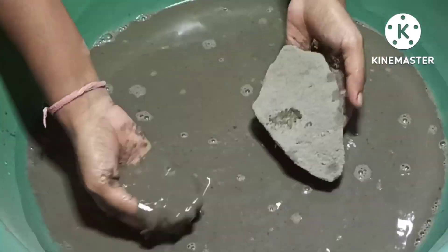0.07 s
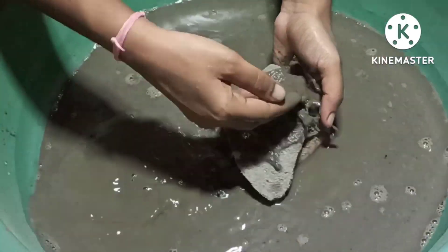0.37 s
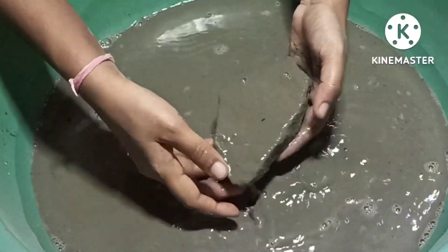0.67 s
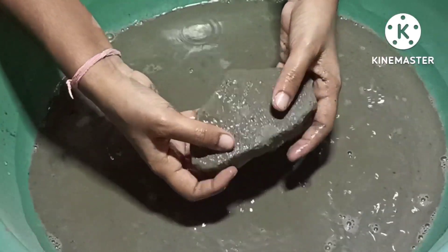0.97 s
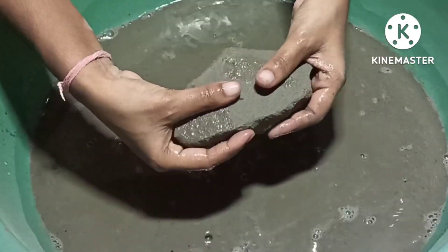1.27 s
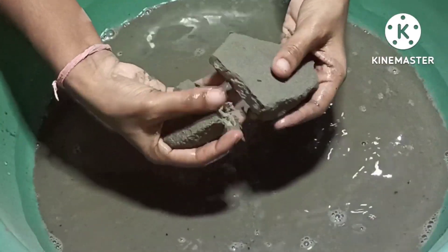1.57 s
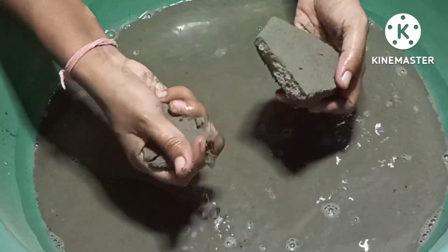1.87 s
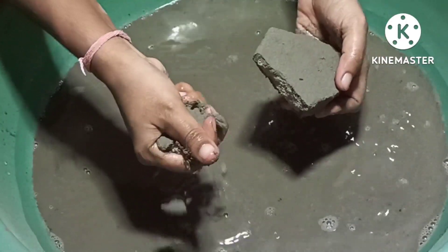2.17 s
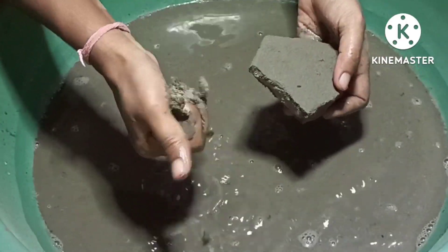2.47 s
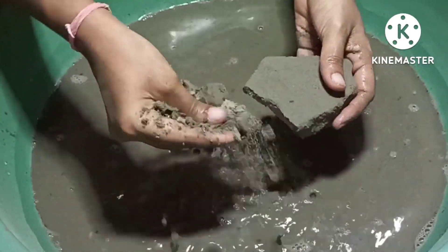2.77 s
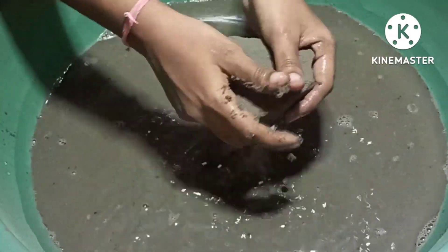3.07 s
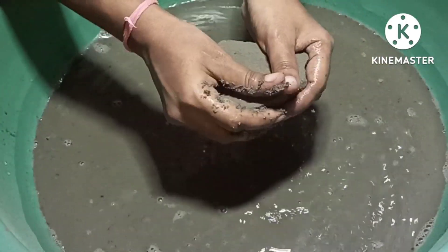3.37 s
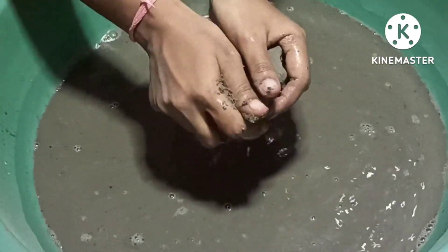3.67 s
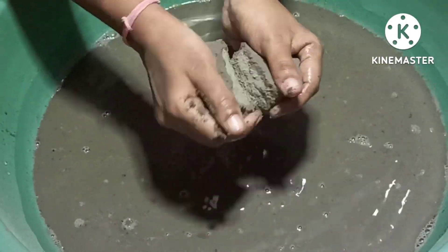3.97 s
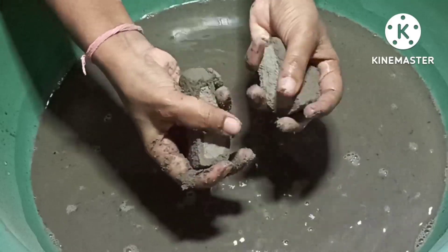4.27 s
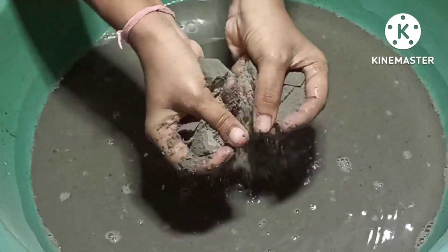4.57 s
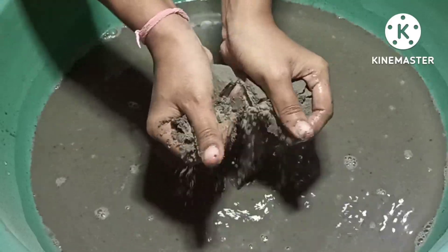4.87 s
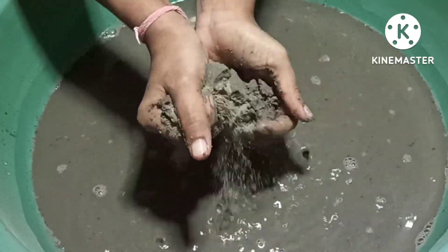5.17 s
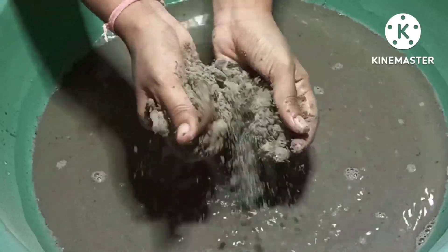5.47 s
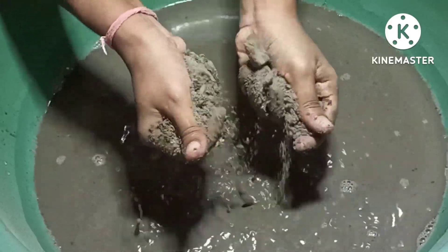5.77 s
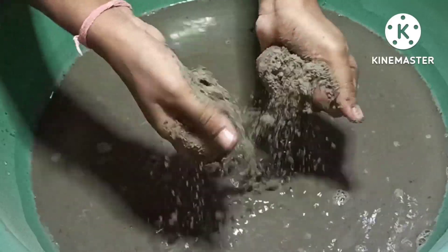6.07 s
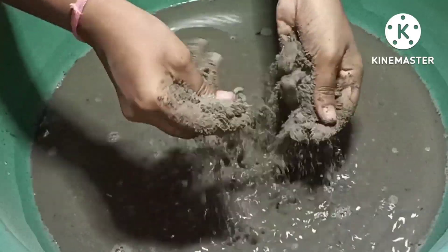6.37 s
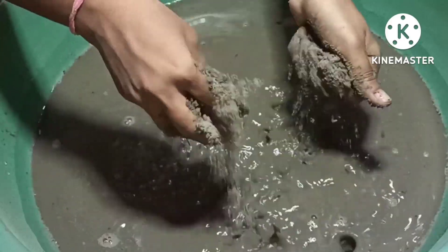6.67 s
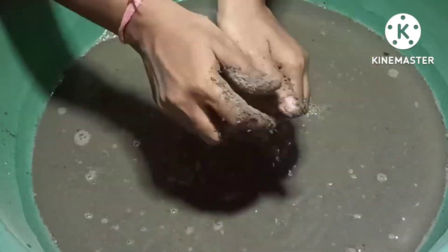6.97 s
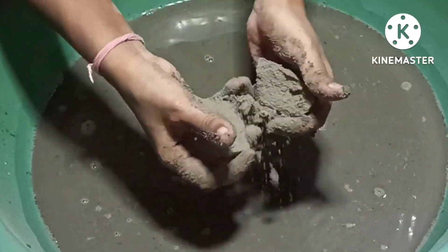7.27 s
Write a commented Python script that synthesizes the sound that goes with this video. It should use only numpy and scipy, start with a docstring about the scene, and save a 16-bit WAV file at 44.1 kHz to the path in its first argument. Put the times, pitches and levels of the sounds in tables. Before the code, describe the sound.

Close crunching of sandy slabs crushed by hand, with dull snaps and grit pattering and plopping into water indoors.

```python
"""Indoors, one microphone close to a plastic tub of muddy water; two hands crumble gritty slabs of sand
and cement just above it. From the start, over a low hum, each squeeze rasps and sheds sand: crumbs hit the
water with a tick and a bubble's plink, fine sand patters among them, and the tub rings a little.
From about 2 s the slabs snap with dull thumps, the hardest near 5.6 s. Towards the end the plinks are
shorter, as sand has thickened the water, and the hum comes up in the last half second."""
import sys
import numpy as np
from scipy import signal
from scipy.fft import rfft, irfft, next_fast_len
from scipy.io import wavfile
from scipy.ndimage import uniform_filter1d, map_coordinates

SR = 44100
rng = np.random.default_rng(int(sys.argv[2]) if len(sys.argv) > 2 else 0)


def store_wav(level_fs):
    """Save 16-bit WAV to argv[1]."""
    pcm = np.round(np.clip(np.atleast_2d(level_fs), -1, 1) * 32767)
    wavfile.write(sys.argv[1], SR, pcm.T.astype(np.int16))


N = 332073

# Fingers squeeze a slab. Each row: start and length in seconds, rasp and shed sand in relative dB.
GRIPS = [(0, .05, -54.5, -54), (0.115, .15, -53.5, -55), (.39, .19, -52.5, -53), (0.622, .2, -60, -59),
         (0.948, .35, -66.5, -68), (1.49, 0.023, -52, -79), (1.841, .15, -52, -61),
         (2.096, .04, -55.5, -59), (2.302, .32, -52.5, -53), (2.797, .06, -49.5, -54),
         (2.978, .1, -56, -52), (3.14, .09, -59, -53), (3.525, 0.07, -61.5, -74), (3.75, .19, -57, -61),
         (4.202, 0.14, -56.5, -74), (4.361, .13, -55.5, -55), (4.581, .16, -47, -48),
         (4.799, .18, -49, -47.5), (5.099, .06, -46.5, -49), (5.22, .25, -55.5, -52.5),
         (5.61, .62, -50, -50), (6.358, .4, -51.5, -50), (6.86, .25, -53.5, -51), (7.184, .16, -57.5, -63),
         (7.46, 0.21, -55.5, -60)]
# Tone of the rasping sand. Each row: frequency in Hz, gain in dB.
RASP_SPECTRUM = [(300, -53), (900, -22.5), (2200, -14), (4000, 5.5), (6500, 1), (9000, -1.5), (15000, -7.5)]
# Tone of the kneading hands. Each row: frequency in Hz, gain in dB.
RUSTLE_SPECTRUM = [(40, -40), (100, 3.5), (170, 2.5), (260, -1.5), (380, -1.5), (600, -9.5), (1000, -20.5),
                   (2500, -21.5)]
# Tone of the room's rumble. Each row: frequency in Hz, gain in dB.
RUMBLE_SPECTRUM = [(20, -2), (45, -20), (62, -2), (90, -1.5), (130, -3), (250, -22), (800, -34)]
# A motor somewhere in the house. Each row: frequency in Hz, relative level in dB.
MOTOR_TONES = [(64.6, -5.5), (113, -17), (161.5, -2.5), (210, -4.5)]
# Rumble and hum together over time. Each row: time in seconds, gain in dB.
ROOM_TONE_LEVELS = [(0, -48.5), (.2, -60.5), (6.9, -60), (7.4, -49)]
# Crumbs and drips hitting the water, a few sharp slab cracks and a ring of the tub.
# Each row: time in seconds, plink level in dB, plink pitch in Hz, tick in relative dB.
TICKS_AND_PLINKS = [(0.0109, -17.5, 4430, -25), (0.0136, -25, 1640, -10.5), (0.1331, -30, 2610, -12),
                    (0.1424, -16, 4080, -20), (0.2125, -29.5, 1590, -11.5), (0.2288, -26.5, 1940, -15),
                    (0.2924, -24.5, 1900, -10), (0.3041, -15.5, 1644, -23), (0.3129, -31, 1380, -34),
                    (0.4073, -19, 2270, -8), (0.4108, -13.5, 4600, -8.5), (0.4295, -15.5, 2350, -10),
                    (0.46, -24.5, 1033, -8.5), (0.558, -14.5, 3920, -21), (0.5675, -18.5, 2530, -18),
                    (0.587, -25, 3820, -25), (0.6433, -32.5, 2480, -24), (0.7002, -26.5, 3520, -34),
                    (0.956, -31.5, 3660, -31), (1.0506, -36.5, 2600, -35), (1.2024, -34, 3620, -37),
                    (1.3246, -30.5, 3430, -32), (1.9803, -21.5, 2470, -4), (2.1067, -18.5, 1420, -14.5),
                    (2.3422, -25.5, 1500, -17.5), (2.4341, -25, 1780, -10), (2.47, -22.5, 1310, -27),
                    (2.5985, -18, 2250, -6.5), (2.675, -24.5, 3870, -19), (2.7135, -29.5, 1460, -29),
                    (2.8327, -19, 2970, -16), (2.8532, -23.5, 2100, -11), (2.8658, -24, 2060, -15),
                    (2.8764, -24, 2760, -15), (2.9198, -14.5, 1430, -1), (2.9572, -28, 1510, -9),
                    (2.9821, -19, 2010, -10), (3.016, -22.5, 6200, -8.5), (3.0455, -31.5, 1050, -7.5),
                    (3.1476, -22.5, 3620, -40), (3.157, -27.5, 754, -10.5), (3.1658, -25.5, 1380, -24),
                    (3.2403, -23, 3900, -19), (3.2903, -28.5, 1430, -16.5), (3.3345, -30, 2430, -25),
                    (3.6562, -29, 4100, -78), (4.696, -25, 1680, -19), (4.7333, -22, 1870, -16),
                    (4.803, -23, 4670, -28), (4.987, -24, 1360, -48), (5.049, -26.5, 1780, -33),
                    (5.1828, -27, 1520, -22), (5.208, -24.5, 1370, -18), (5.2192, -24, 1370, -24),
                    (5.5225, -22, 3570, -22), (5.6002, -7, 4750, -12), (5.6297, -17.5, 2740, -1),
                    (5.7425, -22, 3920, -15), (5.7816, -22.5, 2850, -10), (5.8848, -14.5, 5600, -34),
                    (5.9596, -24.5, 2850, -30), (6.1156, -16.5, 3060, -20), (6.3217, -21, 3830, -30),
                    (6.3436, -25, 2590, -14), (6.375, -20.5, 3070, -32), (6.386, -18.5, 1350, -9),
                    (6.6827, -19.5, 3140, -20), (6.7048, -17.5, 3620, -17), (6.7508, -21, 4360, -7),
                    (6.861, -21.5, 1870, -15.5), (6.982, -23.5, 1300, -36), (7.0082, -21.5, 2725, -16.5),
                    (7.0719, -15.5, 3520, -28), (7.4466, -11.5, 4000, -15)]
# Resonances of the air in the tub. Each row: frequency in Hz, width in Hz, relative gain in dB.
TUB_MODES = [(177.5, 6.3, 17), (376.6, 31, 8), (1044, 90, 1), (1371, 44, 3), (1716, 36, 7.5),
             (2495, 60, -43)]
# The room's reverberation. Each row: frequency in Hz, seconds to die away by 60 dB.
ROOM_DECAY = [(200, 0.98), (1500, 0.79), (5000, 1), (14000, 0.084)]
# Larger pieces slap into the water.
# Each row: time in seconds, relative level in dB, scatter in seconds, middle bubble pitch in Hz.
PIECE_SPLASHES = [(0.131, -36.5, 0.0087, 3050), (0.226, -42.5, 0.012, 1860), (0.405, -24, 0.0035, 2700),
                  (0.428, -26, 0.0038, 2900), (0.46, -36.5, 0.01, 1290), (0.561, -45.5, .075, 2865),
                  (2.988, -32.5, 0.003, 3480), (6.386, -38, 0.0089, 1440)]
# Lumps crushed between the fingers. Each row: peak time in seconds, level in dB, half-width in seconds.
CRUSHED_LUMPS = [(0.151, -34.5, 0.0047), (1.493, -49.5, 0.024), (2.29, -39.5, 0.0084), (3.868, -53, 0.082),
                 (4.375, -39.5, 0.015), (4.529, -35, 0.01), (4.58, -40.5, 0.015), (4.962, -32, 0.0033),
                 (5.257, -32, 0.0029), (5.568, -39, 0.019), (5.63, -18, 0.0014), (6.352, -35, 0.0098)]
# Tone of a collapsing lump. Each row: frequency in Hz, gain in dB.
CRUNCH_SPECTRUM = [(80, -34), (300, 14.5), (1200, 11.0), (4000, 10.0), (7000, 11.5), (15000, -1.0)]
# A slab gives way. Each row: time in seconds, relative thump level in dB, thump pitch in Hz.
SLAB_BREAKS = [(1.905, -29.5, 300), (1.982, -30, 360), (2.338, -22.5, 640), (2.602, -28.5, 390),
               (3.812, -31.5, 284), (3.935, -23.5, 300), (4.354, -31, 292), (4.524, -28, 324),
               (4.958, -24, 380), (5.569, -18, 533), (5.629, -14.5, 366), (6.353, -30, 334),
               (6.756, -30, 252), (7.448, -28.5, 404)]
# The treble is dulled in steps, band by band. Each entry: a band edge in Hz.
BAND_EDGES_HZ = [4780, 6100, 6850, 7700, 8580, 11550]
# The dulling below, between and above those edges, deepest around 9-11 kHz. Each entry: gain in dB.
BAND_GAINS_DB = [-1, -8, -0.5, -4, -13.5, -25.5, -5]

GRIP_ATTACK_S, GRIP_RELEASE_S, TIRE_DB_PER_S = .022, 0.075, 4  # a squeeze builds, slackens and lets go
GRIP_TREMBLE_DB, GRIP_TREMBLE_PER_S = 1.85, 18  # the fingers never press evenly
FALL_S, SETTLE_S = .02, .07  # sand reaches the water a little later and trickles on afterwards
RESTING_RASP_DB, RESTING_SAND_DB = -63.5, -69  # between squeezes, on the scale of GRIPS
BUBBLE_HZ, BUBBLE_LIFE_S, LIFE_POWER = 1960, .0028, 1.21  # before sand falls; smaller bubbles die sooner
MUD_DAMPING = 0.84  # bubble life shrinks by exp(-this) once all the sand has fallen
TOP_HZ = 15600  # nothing is heard above this


def amp(db):
    """Decibels to gain."""
    return 10 ** (np.asarray(db) / 20)


def unit(x):
    """Scale to rms 1."""
    return x / np.sqrt(np.mean(x ** 2) + 1e-20)


def along(points, hz):
    """Read (Hz, value) points on a log axis."""
    f, v = np.transpose(points)
    return np.interp(np.log(hz + 1), np.log(f + 1), v)


def curve(rows):
    """One value per sample from (seconds, value) rows."""
    return np.interp(np.arange(N) / SR, *np.transpose(rows))


def wobble(rate):
    """A smooth random curve, rate knots a second."""
    return map_coordinates(rng.standard_normal(int(N * rate / SR) + 4), [np.arange(N) * rate / SR])


def scatter(count, traits):
    """For each trait, count normal draws held within two deviations."""
    return np.clip(rng.standard_normal((count, traits)), -2, 2).T


def coloured(x, gain_db):
    """Causal (minimum-phase) filter with the given dB curve of frequency."""
    m = 2 * next_fast_len(N // 2 + 8192)
    cepstrum = irfft(np.log(amp(gain_db(np.fft.rfftfreq(m, 1 / SR)))), m)
    cepstrum[1:m // 2] *= 2
    cepstrum[m // 2 + 1:] = 0
    return irfft(rfft(x, m) * np.exp(rfft(cepstrum)), m)[:N]


def shaped(x, spectrum):
    """x filtered by (Hz, dB) points, at rms 1."""
    return unit(coloured(x, lambda hz: along(spectrum, hz)))


def placed(times, waves):
    """Sum short waves, one a row, each from its own time."""
    at = np.round(np.maximum(times, 0) * SR).astype(int)[:, None] + np.arange(waves.shape[1])
    return np.bincount(at.ravel(), waves.ravel(), N)[:N]


def squeezing(levels_db, lag_s, release_s, resting_db):
    """Level in dB over time: every squeeze is an attack, a sagging hold and a release."""
    start, length = np.transpose(GRIPS)[:2]
    t = np.linspace(0, N / SR, 2000)
    age = t[:, None] - lag_s - start
    attack = np.exp(np.minimum(age, 0) / GRIP_ATTACK_S)
    hold = amp(levels_db - TIRE_DB_PER_S * np.clip(age, 0, length))
    release = np.exp(-np.maximum(age - length, 0) / release_s)
    power = amp(resting_db) ** 2 + np.sum((attack * hold * release) ** 2, axis=1)
    return curve(np.column_stack([t, 10 * np.log10(power)]))


def grit(rate, spread_db):
    """Grains breaking loose: random impulses of unequal size, at rms 1."""
    sizes = amp(spread_db * np.minimum(rng.standard_normal(N), 2.5)) * rng.choice([-1, 1], N)
    return unit(sizes * (rng.random(N) < rate / SR))


def rubbing(rasp_db, gain_db=6):
    """Close to the microphone, grains rasp past each other in uneven slips over a smoother hiss."""
    grains = grit(rate=7000, spread_db=9.5) * amp(4.35 * wobble(90))
    hiss = 0.89 * rng.standard_normal(N)
    return amp(rasp_db + gain_db) * shaped(grains + hiss, RASP_SPECTRUM)


def kneading(rasp_db, rustle_db=-54, follow=0.41):
    """The hands rustle, soft and low, louder as they squeeze."""
    level_db = rustle_db + follow * (rasp_db - rasp_db.mean()) + 2.3 * wobble(25)
    return amp(level_db) * shaped(rng.standard_normal(N), RUSTLE_SPECTRUM)


def room_tone():
    """The room rumbles, and a motor farther off in the house adds a wavering hum."""
    t = np.arange(N) / SR
    hum = sum(amp(db) * np.sin(2 * np.pi * hz * t + .5 * wobble(8.1)) for hz, db in MOTOR_TONES)
    rumble = shaped(rng.standard_normal(N), RUMBLE_SPECTRUM)
    return amp(curve(ROOM_TONE_LEVELS)) * (rumble + hum)


def bubbles(hz, life_s, fall, samples=700, decay_power=2.17):
    """Trapped air rings, drops in pitch as it is drawn under the surface, and is soon cut short."""
    t = np.arange(samples) / SR
    age = t / life_s[:, None]
    glide = 1 + fall * (.5 - np.minimum(age, 2))
    turns = hz[:, None] * np.cumsum(glide, axis=1) / SR
    return -np.sin(2 * np.pi * turns) * np.exp(-age ** decay_power)


def muffling(s, mud):
    """Share of its life that a bubble keeps at time s, as the water thickens with sand."""
    return np.exp(-MUD_DAMPING * np.interp(s, np.arange(N) / SR, mud))


def ticks_and_plinks(hits, mud, tick_s=0.000073, spray_s=0.0015, spray_db=-15, tick_db=13.5, top_hz=11000):
    """A crumb ticks on the water, sprays and leaves a ringing bubble; slab cracks share the shape."""
    s, db, hz, impact_db = np.transpose(hits)
    t = np.arange(700) / SR
    life_s = BUBBLE_LIFE_S * (BUBBLE_HZ / hz) ** LIFE_POWER * muffling(s, mud)
    plinks = amp(db)[:, None] * bubbles(hz, life_s, fall=.13)
    envelope = np.exp(-t / tick_s) + amp(spray_db) * np.exp(-t / spray_s)
    burst = rng.standard_normal((len(s), len(t))) * envelope
    burst /= np.linalg.norm(burst, axis=1, keepdims=True)
    contact_age = t / 4.5e-5
    slap = (1 - contact_age) * np.exp(-contact_age)  # first contact is one sharp pressure pulse
    # a small crumb makes both a high bubble and a bright tick; a big one is duller
    jf = 1j * np.fft.rfftfreq(len(t), 1 / SR)
    ratio = jf / hz[:, None]
    colour = (ratio / (1.065 + ratio)) ** 2 / (1 + ratio / 0.92) / (1 + jf / top_hz)
    ticks = irfft(rfft(burst - slap) * colour, len(t)) * amp(impact_db + tick_db)[:, None]
    return placed(s, plinks + ticks)


def satellite_droplets(mud, count=3, scatter_s=.004, lag_s=0.0008, spread=0.45, cycles=5.5, gain_db=-15):
    """Each listed hit throws up a few droplets that land just after it and ring smaller bubbles of their own."""
    s, hit_db, hit_hz = np.repeat(TICKS_AND_PLINKS, count, axis=0).T[:3]
    delay, pitch, size = scatter(len(s), 3)
    hz = np.maximum(np.sqrt(hit_hz * 3500) * np.exp(spread * pitch), hit_hz)
    db = np.minimum(hit_db, -19) + gain_db + 5.0 * size
    waves = amp(db)[:, None] * bubbles(hz, cycles / hz * muffling(s, mud), fall=0.14)
    return placed(s + lag_s + scatter_s * np.abs(delay), waves)


def tub(x, ring_db=-3, wall_db=-15):
    """The air above the water rings in a few modes, and the walls answer within milliseconds."""
    m = next_fast_len(N + SR // 2)
    f = np.fft.rfftfreq(m, 1 / SR)
    modes = sum(amp(db) * 1j * f * width / (hz * hz - f * f + 1j * f * width)
                for hz, width, db in TUB_MODES)
    walls = sum(np.exp(-2j * np.pi * f * s) for s in (.0023, .0049, .0083)) / (1 + 1j * f / 4000)
    return irfft(rfft(x, m) * (amp(ring_db) * modes + amp(wall_db) * walls), m)[:N]


def room(x):
    """The room returns a short diffuse tail whose top treble dies first."""
    hz, t, noise = signal.stft(rng.standard_normal(SR // 2), SR, nperseg=256)
    decay = amp(-60 * t / along(ROOM_DECAY, hz)[:, None])
    tail = signal.istft(noise * decay, SR, nperseg=256)[1]
    return signal.fftconvolve(np.pad(x, (300, 0)), tail / np.linalg.norm(tail))[:N]


def patter(sand_db, count, centre_hz, spread, cycles, spread_db, gain_db):
    """Falling sand makes a crowd of short-lived bubbles, as loud as the pour is thick."""
    when = rng.random(count) * N / SR
    pitch, size, ringing = scatter(count, 3)
    hz = centre_hz * np.exp(spread * pitch)
    life_s = cycles * np.exp(.3 * ringing) / hz
    waves = amp(spread_db * size)[:, None] * bubbles(hz, life_s, fall=0.033, samples=400)
    return amp(sand_db + gain_db) * unit(placed(when, waves))


def small_crumbs(sand_db, count=95, loose_db=-57, level_db=-31, follow=0.094, spread_db=3,
                 centre_hz=3500, spread=0.27, impact_db=6):
    """Rows of small crumbs that fall once the sand runs freely, denser and louder as it thickens."""
    chance = np.cumsum(np.maximum(sand_db - loose_db, 0))
    at = np.searchsorted(chance / chance[-1], (np.arange(count) + rng.random(count)) / count)
    size, pitch, hardness = scatter(count, 3)
    db = level_db + follow * (sand_db[at] - np.median(sand_db[at])) + spread_db * size
    hz = centre_hz * np.exp(spread * pitch)
    return np.column_stack([at / SR, db, hz, db + impact_db + spread_db * hardness])


def splashes(count=70, spread=0.335, cycles=4, gain_db=-2):
    """A larger piece folds in a whole cluster of bubbles at once."""
    out = np.zeros(N)
    for s, db, scatter_s, centre_hz in PIECE_SPLASHES:
        delay, pitch, size = scatter(count, 3)
        hz = centre_hz * np.exp(spread * pitch)
        waves = amp(2 * size)[:, None] * bubbles(hz, cycles / hz, fall=0.017)
        cluster = placed(s + scatter_s * delay, waves)
        out += amp(db + gain_db) * cluster * np.sqrt(2 * scatter_s * SR) / np.linalg.norm(cluster)
    return out


def droplets(count=4, flight_s=.36, level_db=-27, fade_db_per_s=22, spread_db=2.5,
             centre_hz=3200, spread=0.21):
    """Rows of droplets thrown up by each splash; the longer they fly, the softer they land."""
    s = np.repeat(np.transpose(PIECE_SPLASHES)[0], count)
    flight = flight_s * rng.random(len(s))
    size, pitch = scatter(len(s), 2)
    db = level_db - fade_db_per_s * flight + spread_db * size
    return np.column_stack([s + flight, db, centre_hz * np.exp(spread * pitch), db])


def crunches():
    """A lump collapses in a brief, dense run of fractures."""
    t = np.arange(N) / SR
    swell = sum(amp(db) / (1 + ((t - s) / half_width) ** 4) for s, db, half_width in CRUSHED_LUMPS)
    return swell * shaped(grit(rate=9300, spread_db=2.5), CRUNCH_SPECTRUM)


def snaps(cycles=1.08, shudder_gain=0.33, shudder_s=0.0069, palms_hz=650):
    """A break releases one heavily damped thump, muffled by the palms; the hands shudder after it."""
    s, db, hz = np.transpose(SLAB_BREAKS)
    t = np.arange(SR // 16) / SR
    thumps = bubbles(hz, cycles / hz, fall=0, samples=len(t))  # a damped tone of steady pitch
    band = signal.butter(2, [130, 520], 'band', fs=SR, output='sos')
    noise = unit(signal.sosfilt(band, rng.standard_normal(thumps.shape)))
    shudder = shudder_gain * noise * np.exp(-t / shudder_s)
    breaks = placed(s, amp(db - 1.5)[:, None] * (thumps + shudder))
    return signal.sosfilt(signal.butter(2, palms_hz, fs=SR, output='sos'), breaks)


def scene():
    """At the microphone: hands, water and tub close up, the small room faint behind them."""
    _, _, rasps, sheds = np.transpose(GRIPS)
    tremble_db = GRIP_TREMBLE_DB * wobble(GRIP_TREMBLE_PER_S)
    rasp_db = squeezing(rasps, 0, GRIP_RELEASE_S, RESTING_RASP_DB) + tremble_db
    sand_db = squeezing(sheds, FALL_S, SETTLE_S, RESTING_SAND_DB)
    fallen = np.cumsum(amp(sand_db) ** 2)
    mud = fallen / fallen[-1]
    fine = patter(sand_db, count=9000, centre_hz=1737, spread=0.522, cycles=2.24, spread_db=2.5,
                  gain_db=-2)
    coarse = patter(sand_db, count=420, centre_hz=3600, spread=0.4, cycles=0.8, spread_db=5,
                    gain_db=-4.5)
    hits = np.vstack([TICKS_AND_PLINKS, small_crumbs(sand_db), droplets()])
    water = ticks_and_plinks(hits, mud) + satellite_droplets(mud) + fine + coarse + splashes()
    hands = rubbing(rasp_db) + crunches() + snaps()
    near = water + hands + tub(water + 0.32 * hands)
    return (near + amp(-22.5) * room(near) + kneading(rasp_db) + room_tone())[None]


def record(dry):
    """Sharp peaks are rounded off, deep bass is shed, and the treble is dulled in steps, then cut off."""
    sound = dry[0] / (1 + (dry[0] / .5) ** 4) ** (1 / 4)
    sound = signal.sosfilt(signal.butter(4, 58, 'high', fs=SR, output='sos'), sound)
    steps = np.array(BAND_GAINS_DB, float)
    sound = coloured(sound, lambda hz: uniform_filter1d(steps[np.searchsorted(BAND_EDGES_HZ, hz)], 1200))
    m = next_fast_len(N + 8192)
    passband = np.fft.rfftfreq(m, 1 / SR) < TOP_HZ
    return irfft(rfft(sound, m) * passband, m)[None, :N]


dry = scene()
out = record(dry)
store_wav(out)
```